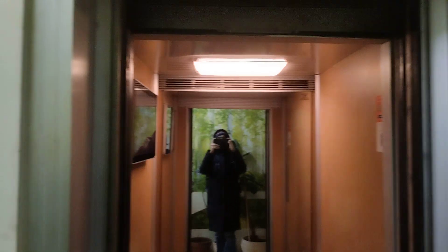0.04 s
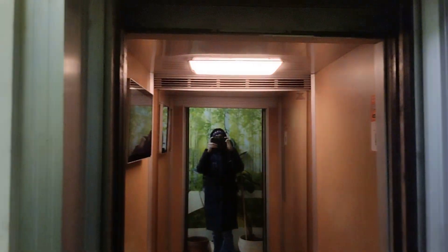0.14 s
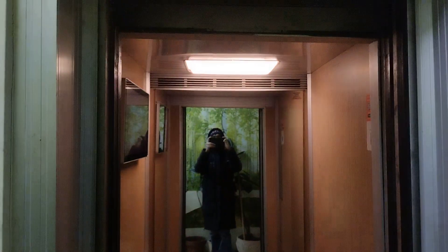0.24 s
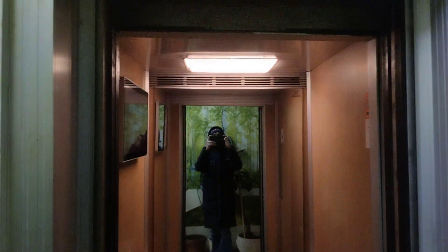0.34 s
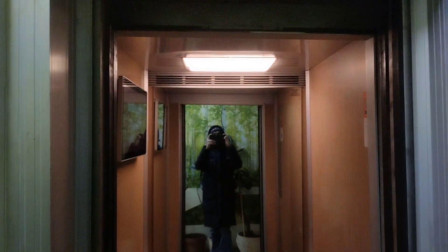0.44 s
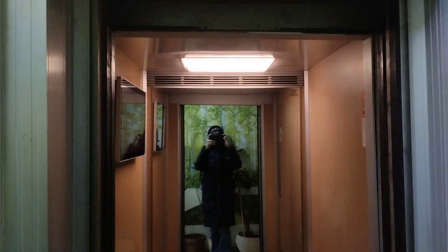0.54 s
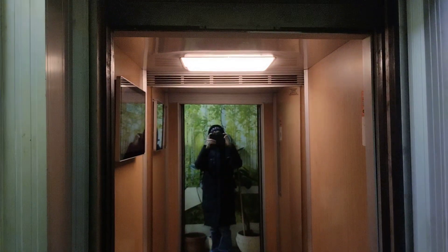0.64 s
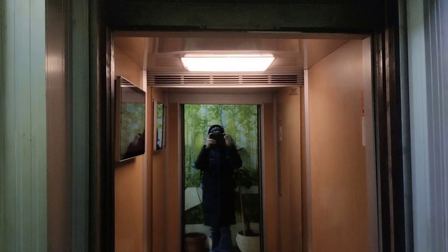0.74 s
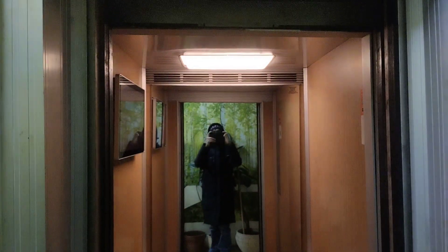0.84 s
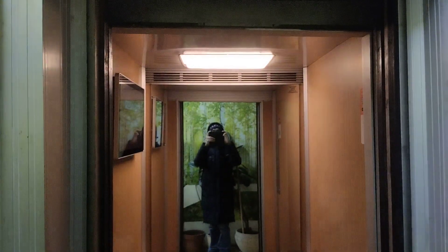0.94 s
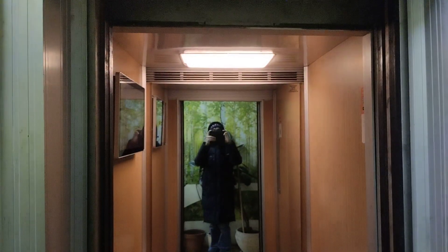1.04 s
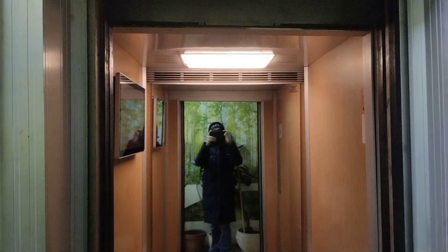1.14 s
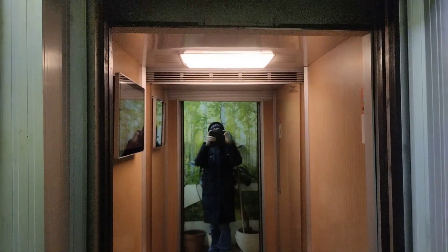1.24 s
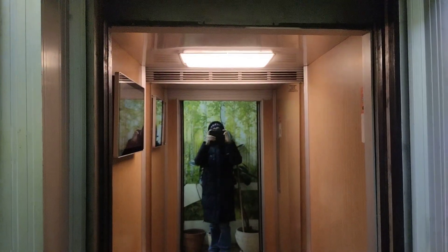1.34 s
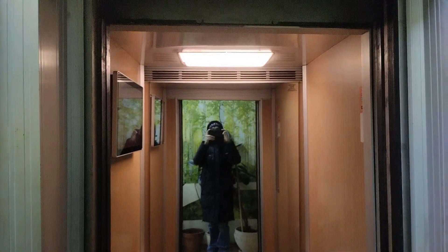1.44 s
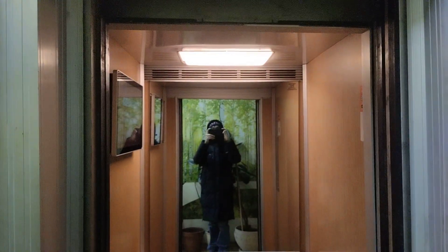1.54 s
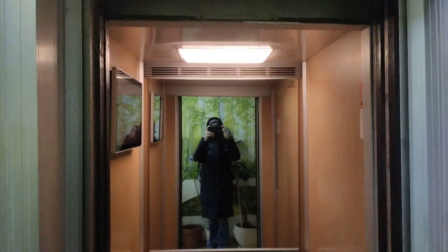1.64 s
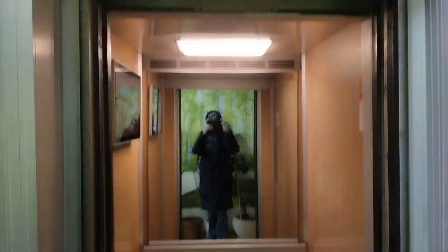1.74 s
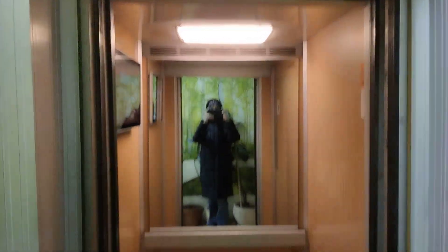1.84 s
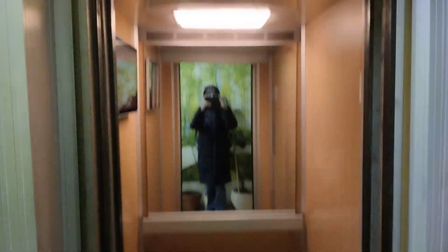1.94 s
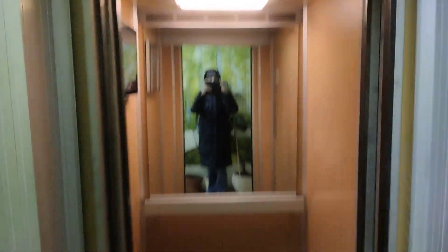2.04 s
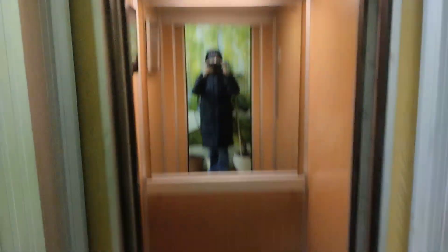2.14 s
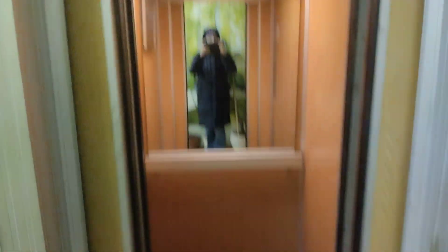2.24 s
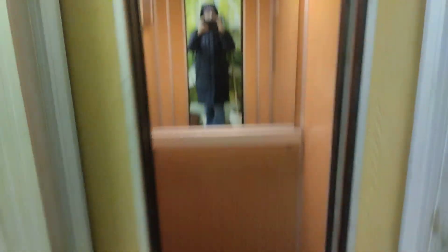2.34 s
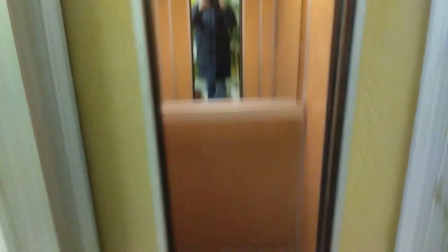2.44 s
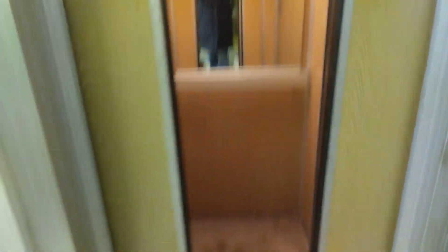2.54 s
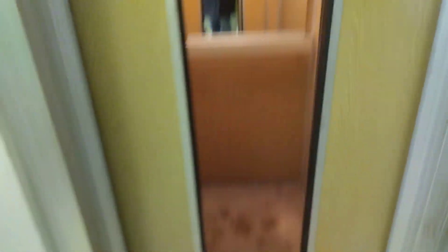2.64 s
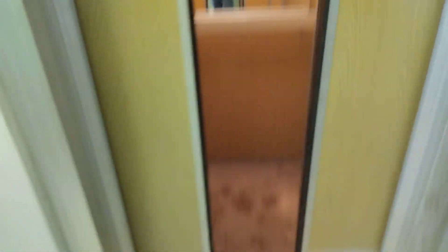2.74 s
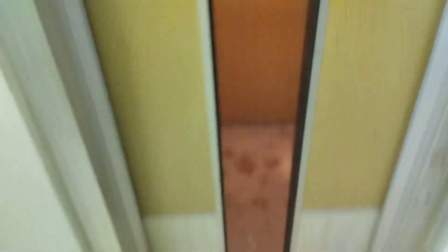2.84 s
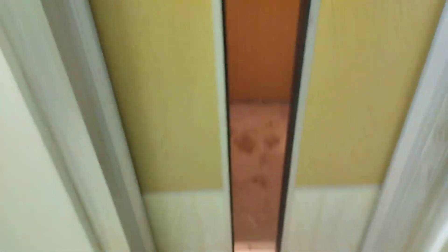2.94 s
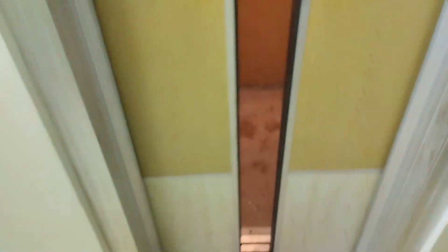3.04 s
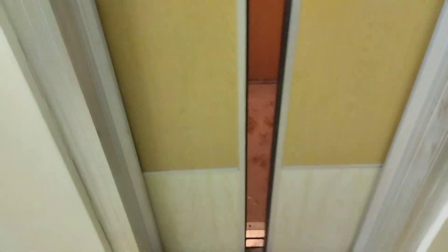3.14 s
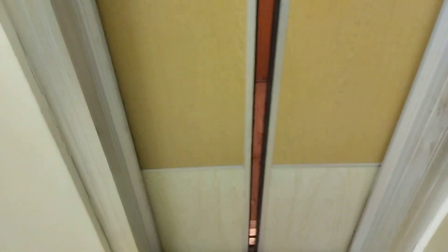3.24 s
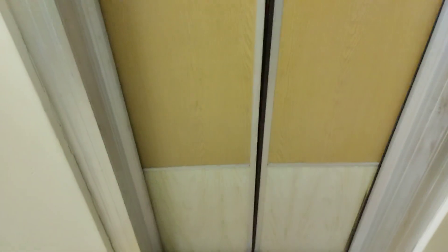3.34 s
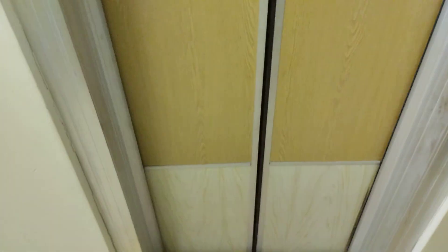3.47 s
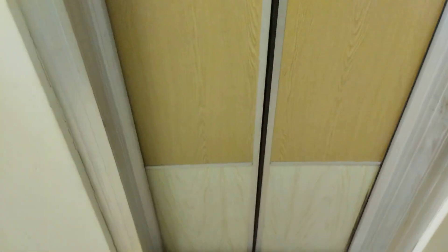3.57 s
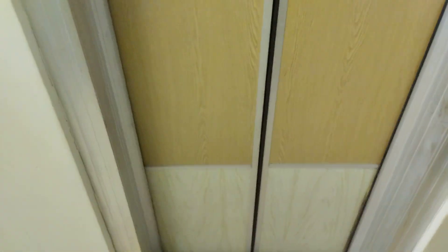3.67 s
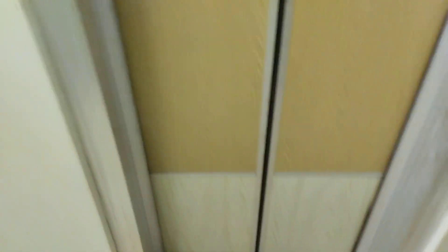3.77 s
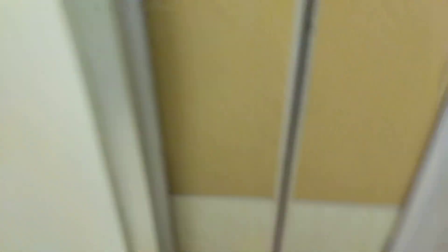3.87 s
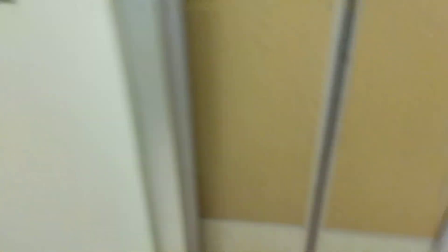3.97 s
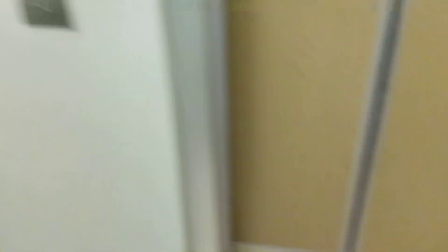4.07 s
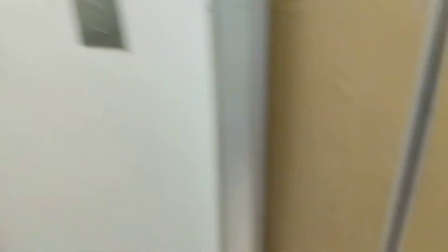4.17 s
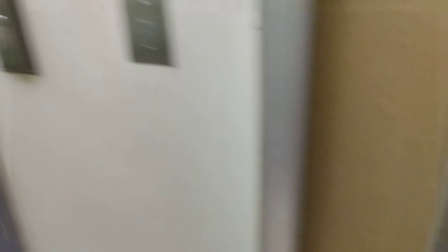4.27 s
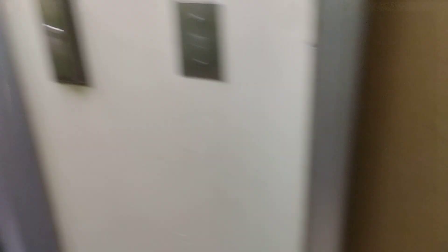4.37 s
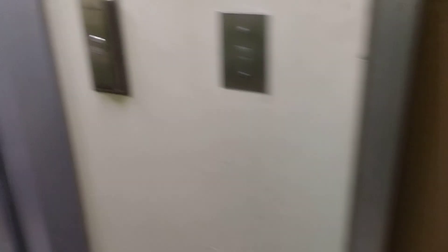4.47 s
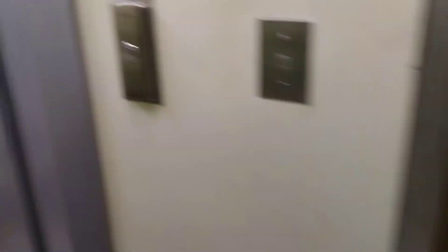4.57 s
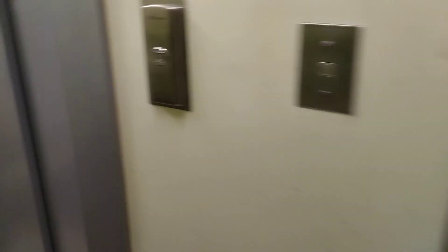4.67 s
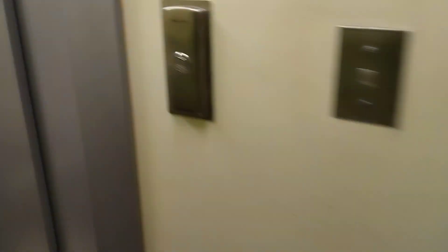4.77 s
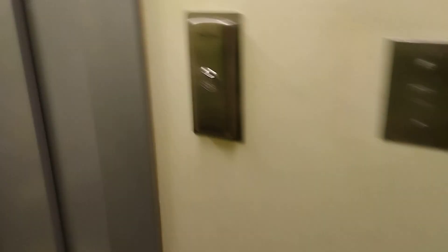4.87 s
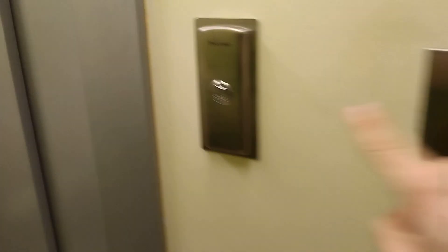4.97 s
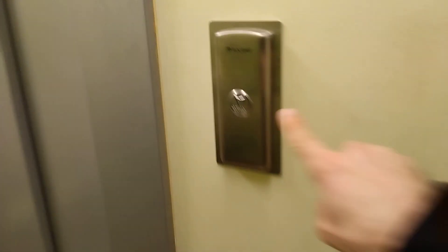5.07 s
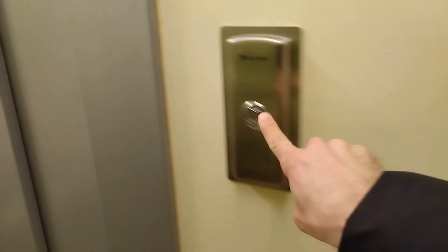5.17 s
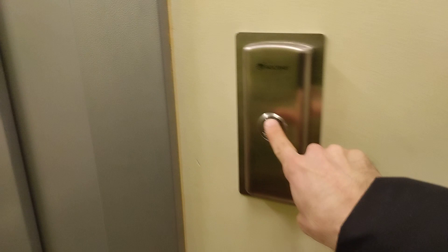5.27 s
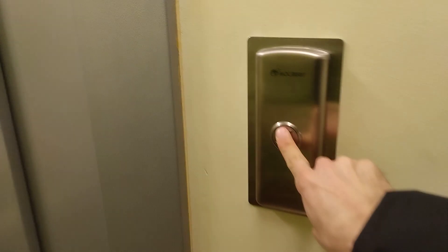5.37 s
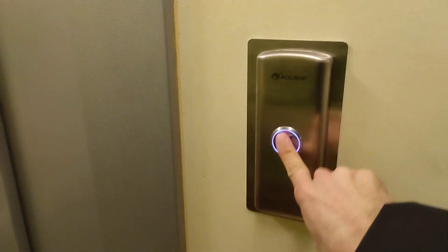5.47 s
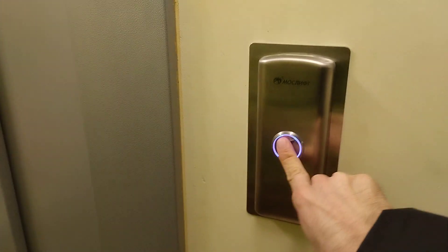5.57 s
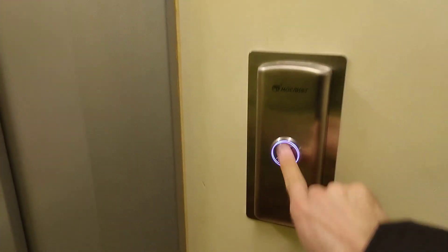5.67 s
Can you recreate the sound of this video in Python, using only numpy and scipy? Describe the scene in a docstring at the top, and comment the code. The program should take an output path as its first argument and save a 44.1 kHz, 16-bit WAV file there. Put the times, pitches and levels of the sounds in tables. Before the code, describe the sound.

A quiet, hard-walled lobby opens with low air noise, a faint hum from the lift car and barely audible cloth. At about 1.3 s the sliding doors start with small ticks and a soft rumble. From 1.7 s the rollers rattle unevenly, with panel knocks, a deep shudder and a dry scrape; stronger clanks come near 2.5 s. Around 3.0 s there is a very brief high squeak and more knocks, then a sharp snap and tight cluster of blows at 3.35-3.45 s, and the loudest clack at 3.5 s as the doors meet, ringing and echoing shortly. Small after-knocks at 3.7-3.8 s fade into quiet by about 4 s. Close by, a sleeve rustles, with faint clicks at 4.5 s and a soft low bump at 4.75 s; rustling swells most near 5.1 s. A button clicks at 5.3 s and again, slightly harder, at 5.65 s.

```python
"""A hard lobby: sliding lift doors close. Rollers rumble and rattle on the track, shaped noise through resonances;
the hanging panels shudder as a slow sine, knock and snap as noise bursts that ring hard parts, and squeak;
some metal parts rub or ring on as noise through narrow resonances. A person close by turns: a sleeve rustles as
swelling noise strokes, and a finger presses and releases a call button with short snaps.
Low air noise lies beneath, and the walls echo the sharp sounds."""
import sys
import numpy as np
from scipy import signal
from scipy.fft import rfft, irfft
from scipy.io import wavfile
from scipy.ndimage import uniform_filter1d

SR = 44100
rng = np.random.default_rng(int(sys.argv[2]) if len(sys.argv) > 2 else 0)


def makeup_ratio(level_db):
    """Linear amplitude ratio for a level in decibels (20 dB per factor of ten)."""
    decades = np.asarray(level_db, float) / 20
    return 10 ** decades


def dump_mix(stems):
    """Bounce the given channels to the path in sys.argv[1] as a 16-bit WAV at rate SR."""
    frames = np.atleast_2d(stems).T  # one column per channel
    limited = np.clip(frames, -1, 1)  # hard clip at full scale
    pcm = np.round(limited * 32767).astype(np.int16)
    wavfile.write(sys.argv[1], SR, pcm)


N = 251811
T = np.arange(N) / SR


def unit(x):
    """Scale to rms 1."""
    return x / np.sqrt(np.mean(x ** 2))


def peak(x):
    """Scale to peak 1."""
    return x / np.abs(x).max()


def add(out, s, x):
    """Mix x into out at time s."""
    i = int(s * SR)
    out[i:i + len(x)] += x[:N - i]


def curve(table):
    """Draw the columns of a table over time, with a gate that is silent outside its span."""
    s, *columns = np.transpose(table)
    gate = np.interp(T, [s[0] - .02, s[0], s[-1], s[-1] + 0.028], [0, 1, 1, 0])
    return [np.interp(T, s, c) for c in columns], gate


def stroke(s, db, swell, fade):
    """A rounded swell and fade, 20 dB down at the given times from the top."""
    return makeup_ratio(db - 20 * np.where(T < s, (s - T) / swell, (T - s) / fade) ** 2)


def colour(x, points):
    """Shape x by a spectrum of (Hz, dB) points; rms 1."""
    hz, db = np.transpose(points)
    f = np.maximum(np.fft.rfftfreq(len(x), 1 / SR), 1)
    gain = makeup_ratio(np.interp(np.log(f), np.log(hz), db))
    return unit(irfft(rfft(x) * gain, len(x)))


def band(x, lo_hz, hi_hz):
    """Keep only the sound between two pitches."""
    return signal.sosfilt(signal.butter(2, [lo_hz, min(hi_hz, .45 * SR)], "band", fs=SR, output="sos"), x)


def ring(x, hz, t60):
    """One mode that decays by 60 dB in t60 seconds; a unit pulse rings with height about 1."""
    r, w = np.exp(-np.log(1000) / (t60 * SR)), 2 * np.pi * hz / SR
    return signal.lfilter([np.sin(w)], [1, -2 * r * np.cos(w), r * r], x)


def drum(x, modes):
    """Broad low resonances, each given by pitch, width and level; the sum has rms 1."""
    return unit(sum(makeup_ratio(db) * unit(ring(x, hz, 2.63 / width)) for hz, width, db in modes))


def walk(rate):
    """Random levels held 1 / rate seconds and smoothed; spread 1."""
    k = int(SR / rate)
    held = np.repeat(rng.standard_normal(N // k + 1), k)
    return unit(uniform_filter1d(held, k))[:N]


def grit(rate, spread_db):
    """Noise whose strength wanders, like tiny contacts of uneven force."""
    return rng.standard_normal(N) * makeup_ratio(spread_db * walk(rate))


# spectrum of the still air: pitch_hz, level_db (per Hz, relative)
LOBBY_AIR = [(8, -10), (16, -2.5), (37, -9), (52, -8), (74, -10), (88, -7), (101, -22), (127, -11.5),
             (163, -17), (193, -19.5), (255, -23.5), (607, -27.5), (660, -29.5), (1330, -35.5),
             (16000, -44.5)]
# low hum of the lift car: pitch_hz, width_hz (about 4 dB down), level_db (relative)
CAR_HUM = [(75, 13, -0.5), (190, 15, -10)]


def lobby():
    """Still air of the building; the closing doors shut off most of the low hum of the car."""
    air_db, hum_db = -61.5, -63
    gap = np.interp(T, [1.8, 3.4], [1, .15])
    air = makeup_ratio(air_db) * colour(grit(17, 0.63), LOBBY_AIR)
    return air + gap * makeup_ratio(hum_db) * drum(grit(2.9, 1.9), CAR_HUM)


def room(x):
    """Hard walls: a dense tail of decaying noise whose treble dies first."""
    low_t60_s, high_t60_s = 0.69, 0.47
    t, tail = T[:SR], rng.standard_normal((2, SR))
    low = band(tail[0], 39, 3900) * np.exp(-np.log(1000) * t / low_t60_s)
    high = band(tail[1], 2000, 9700) * np.exp(-np.log(1000) * t / high_t60_s)
    echo = (low + high) * (1 - np.exp(-t / 0.0034))
    return signal.fftconvolve(x, echo / np.sqrt(np.sum(echo ** 2)))[:N]


def bump():
    """A soft jolt of the hand that holds the microphone: about one cycle of deep pressure."""
    centre_s, pitch_hz, level_db = 4.752, 26, -29  # level before the fade around the centre
    u = (T - centre_s) * pitch_hz
    return makeup_ratio(level_db) * np.sin(2 * np.pi * u) * np.exp(-(u / .45) ** 2)


# rustle strokes: loudest_s, level_db, treble_db (relative to the low rustle), swell_s, fade_s (both over 20 #
# dB); # the last is no rustle but a faint swell of noise that lingers after the button press
SLEEVE_STROKES = [(.05, -67.5, -3, 0.54, 0.46), (4.14, -61, 1.5, 0.17, 0.39), (4.47, -65, -3.5, 0.11, 0.34),
                  (4.66, -57.5, 0.5, 0.16, 0.16), (4.77, -55.5, 0, 0.08, 0.052),
                  (4.93, -52.5, 4.5, 0.18, 0.24), (5.08, -50.5, -1, 0.16, 0.23), (5.44, -64, 1, 0.25, 0.71)]
# spectrum of rustling cloth: pitch_hz, level_db (per Hz, relative)
CLOTH_SPECTRUM = [(59, -23), (100, 1), (202, 1), (289, -0.5), (322, 3.5), (471, 0.5), (705, -3), (1130, -5),
                  (1450, -3.5), (3940, -9.5), (6020, -5.5), (9020, 2.5), (16000, -15)]


def sleeve():
    """Smooth synthetic cloth sliding on itself, each stroke swells, fades and has its own brightness; a last
    faint swell of noise lingers after the button press."""
    split_hz = 3950
    low = unit(band(colour(grit(330, 0.27), CLOTH_SPECTRUM), 101, split_hz))
    high = unit(band(colour(grit(200, 0.76), CLOTH_SPECTRUM), split_hz, 22000))
    return sum(stroke(s, db, swell, fade) * (low + makeup_ratio(treble_db) * high)
               for s, db, treble_db, swell, fade in SLEEVE_STROKES)


# short snaps of the door and the button: start_s, level_db, treble_db and ring_db (relative to level),
# contact_s (the chatter lasts as if it were at least 0.0002)
SNAPS = [(1.238, -64, 8, -20, 0.00091), (1.848, -48, 17, -20, 0.00024), (2.639, -39, 12.5, -20, .0003),
         (3.3536, -24.5, 14, -20, 0.00025), (4.518, -42.5, 4, -17, 0.00019),
         (4.552, -48, 15.5, -20, 0.00023), (4.759, -43, -7, -8, .004), (5.306, -65, -26, 7, 0.0028),
         (5.311, -36, 1.2, -4, 0.0021), (5.627, -49, -19, -4, 0.009), (5.647, -33, -7, -5, 0.0018)]
# modes of the small hard parts: pitch_hz, level_db (relative), t60_s
SMALL_PART_MODES = [(280, -9, .15), (620, -9, .05), (1150, 0, .05), (1400, -1, .025), (1900, -3, .025),
                    (2400, -2, .02), (2950, -4, .02), (4700, -19, .2), (7400, -8, .015), (9000, -10, .02)]


def snaps():
    """Short snaps of the door and the button: a burst of contact noise rings small hard parts."""
    out, t = np.zeros(N), T[:SR // 5]
    for s, db, treble_db, ring_db, contact in SNAPS:
        u = t / max(contact, .0002)
        push = rng.standard_normal(len(t)) * u * np.exp(-u)
        # the snap is one sharp step among the chatter
        push[int(contact * SR)] += .3 * np.sqrt(np.sum(push ** 2))
        parts = sum(makeup_ratio(d) * peak(ring(push, hz, t60)) for hz, d, t60 in SMALL_PART_MODES)
        body = peak(band(push, 400, 2750)) + makeup_ratio(ring_db) * peak(parts)
        hiss = peak(band(band(push, 5200, 10700), 5200, 13600))
        treble = peak(hiss + 0.36 * peak(ring(push, 8500, 0.0038)))
        add(out, s, makeup_ratio(db) * (body + makeup_ratio(treble_db) * treble))
    return out


# rough narrow rings of metal parts: start_s, length_s, pitch_hz, width_hz,
# level_db (before the rise and fade)
ROUGH_RINGS = [(1.337, 0.52, 2200, 150, -60), (1.342, .36, 3380, 190, -57), (1.506, 0.18, 1600, 200, -52.5),
               (1.662, 0.39, 3350, 120, -62), (1.846, 0.092, 8000, 200, -51), (1.973, .04, 6300, 200, -45),
               (2.466, 0.21, 2850, 140, -41), (2.482, 0.14, 420, 90, -35.5),
               (2.553, .09, 4030, 129.6, -39.5), (2.554, 0.061, 720, 50, -39),
               (2.967, 0.11, 720, 64.8, -48.5), (3.024, .07, 14000, 800, -55),
               (3.039, 0.057, 8200, 460, -43), (3.093, 0.087, 4290, 35, -42.5),
               (3.094, 0.088, 2540, 50, -48), (3.098, 0.16, 5500, 30, -48),
               (3.515, 0.044, 1960, 150, -25.5), (3.519, 0.21, 4030, 70, -39.5),
               (3.521, .23, 3440, 60, -46), (3.528, .16, 2234, 92.59, -31), (3.53, .15, 4560, 70, -40.5),
               (3.705, 0.077, 8700, 845, -46.5), (3.801, .016, 1880, 200, -36),
               (3.82, .014, 1880, 200, -38), (4.062, .014, 500, 600, -48), (4.448, 0.068, 8640, 300, -58)]


def rough_rings():
    """Some metal parts rub, others ring on after a knock or thud softly; noise through one resonance each."""
    out = np.zeros(N)
    for s, length, hz, width, db in ROUGH_RINGS:
        t = T[:int(length * SR)]
        sing = unit(ring(rng.standard_normal(len(t)), hz, np.log(1000) / (np.pi * width)))
        fade = np.interp(t, [0, .006, 0.8 * length, length], [0, 0.89, 0.3, 0])
        add(out, s, makeup_ratio(db) * sing * fade)
    return out


# a guide squeaks: time_s, pitch_hz, level_db (middle values, both flicker)
GUIDE_SQUEAK = [(3.025, 7100, -56), (3.047, 7007, -40.5), (3.099, 6920, -64), (3.11, 7099, -62)]


def squeak():
    """A stick-slip whistle: a sine whose pitch and level flicker."""
    jitter = 0.0114 * walk(440)
    (hz, db), gate = curve(GUIDE_SQUEAK)
    phase = 2 * np.pi * np.cumsum(hz * (1 + jitter)) / SR
    return np.sqrt(2) * gate * makeup_ratio(db) * makeup_ratio(4.1 * walk(330)) * np.sin(phase)


# panels swinging on their hangers: time_s, level_db
PANEL_SWING = [(1.32, -75), (1.38, -48), (1.47, -45), (1.52, -63), (1.72, -44), (1.87, -53), (1.94, -40),
               (2.12, -52), (2.27, -37), (2.42, -43), (2.49, -33), (2.69, -35), (2.77, -41), (2.92, -37.5),
               (3.04, -50), (3.12, -39.5), (3.17, -66), (3.23, -46), (3.59, -49), (3.64, -40), (3.76, -54),
               (3.88, -47), (4.09, -56), (4.2, -73)]


def shudder():
    """The slow swing of the hanging panels; the first pull tightens the hangers and lifts the pitch."""
    swing_hz, taut_hz, settle_s = 27.8, 6, 0.1
    (db,), gate = curve(PANEL_SWING)
    since_pull = np.maximum(T - PANEL_SWING[0][0], 0)
    hz = swing_hz + taut_hz * np.exp(-(since_pull / settle_s) ** 2 / 2)
    phase = 2 * np.pi * np.cumsum(hz * (1 + 0.014 * walk(7.7))) / SR
    return np.sqrt(2) * gate * makeup_ratio(db) * np.sin(phase)


# resonances of the lift shaft: pitch_hz, width_hz (about 4 dB down), level_db (relative)
SHAFT_MODES = [(77, 65, -0.5), (108.7, 16.4, -3.5)]
# resonances of the track: pitch_hz, width_hz (about 4 dB down), level_db (relative)
TRACK_MODES = [(156.2, 3, -1.5), (202.4, 14, 5), (237.3, 47, 4.5), (282.2, 5.6, -4), (320, 71, -10),
               (355, 25, -27)]
# the carriage thumps over joints in the track: loudest_s, rumble_db, boom_db,
# fade_s (over 20 dB, its sign does not matter)
JOINT_THUMPS = [(1.389, -48.5, -44.5, 0.27), (1.671, -44, -43.5, 0.15), (1.76, -48.5, -61, 0.34),
                (1.99, -47.5, -59, 0.27), (2.35, -43, -66, 0.3), (2.5, -46.5, -49, 1.2),
                (3.2, -38.5, -49, 0.19), (3.429, -32, -82, -0.09), (3.55, -42.5, -39, 0.12),
                (3.72, -55, -39.5, 0.17), (3.85, -55, -54.5, 0.03)]


def boom_and_rumble(load_db):
    """Rollers drum the track and the shaft behind it, which rings on; joints add thumps."""
    load_ref_db, thump_rise_s = -43.5, 0.024
    boom_db, boom_share, boom_t60_s = -47, 0.48, 0.33  # level at the reference load; dB per dB of load
    rumble_db, rumble_share = -47.5, 1
    keep = np.exp(-np.log(1000) / (boom_t60_s * SR))
    shaft = signal.lfilter([1 - keep], [1, -keep], makeup_ratio(boom_db + boom_share * (load_db - load_ref_db)))
    track = makeup_ratio(rumble_db + rumble_share * (load_db - load_ref_db))
    for s, thump_rumble_db, thump_boom_db, fade in JOINT_THUMPS:
        jolt = stroke(s, 0, thump_rise_s, fade)
        shaft = shaft + makeup_ratio(thump_boom_db) * jolt
        track = track + makeup_ratio(thump_rumble_db) * jolt
    bumps = grit(40, 1.3)
    boom = drum(bumps, SHAFT_MODES) + makeup_ratio(-5.5) * unit(band(bumps, 74, 141))
    rumble = drum(bumps, TRACK_MODES) + makeup_ratio(-5.5) * unit(band(bumps, 93, 540))
    return shaft * unit(boom) + track * unit(rumble)


# spectrum of the rattling track: pitch_hz, level_db (per Hz, relative)
RATTLE_SPECTRUM = [(180, 4), (300, -12), (385, 4), (417, -20), (535, 0.5), (861, -5), (1010, 2.5),
                   (1130, -2), (1530, 0), (2230, -1), (2890, -6), (3170, -9.5), (4500, -19), (5850, -24),
                   (9900, -120)]
# spectrum of the dragging guide shoes, also used by the ticks of the knocks: pitch_hz, level_db (per Hz, relative)
SCRAPE_SPECTRUM = [(1760, -10), (3000, -14), (3170, -4), (3940, -7), (4700, -2), (6040, 0.5), (7200, -1),
                   (8340, 5), (12000, -10.5), (16000, -16)]
# modes of the door panel, also rung by the knocks: pitch_hz, level_db (relative),
# free_t60_s (each player takes a share of it)
PANEL_MODES = [(541, 6, 0.24), (720, -28, 0.067), (800, -2.5, 0.13), (965, -6.5, 0.25), (1126, -7, 1),
               (1470, -2, 0.25), (1650, -3.5, 0.11), (1880, 2.5, 0.17), (1973, -0.5, 0.22), (2234, 2, 0.11),
               (2278, 0, 0.36), (2530, -18, 0.64), (2600, -11, 0.18), (2960, -33, 0.98), (3270, -22, 0.073),
               (3440, -13, 0.22), (4030, -6.5, 0.64), (4290, -0.5, 0.059), (4660, -2, 0.12),
               (5200, -7.5, 0.45), (5640, -5, 0.56)]


def rattle_and_scrape(load_db, drag_db):
    """Small contacts rattle the panel modes, and the guide shoes drag with a flickering hiss."""
    contacts = grit(60, 2.1)
    panel = sum(makeup_ratio(db) * unit(ring(contacts, hz, 0.27 * t60)) for hz, db, t60 in PANEL_MODES)
    rattle = colour(contacts, RATTLE_SPECTRUM) + makeup_ratio(-8.5) * unit(panel)
    scrape = colour(grit(150, 1.64), SCRAPE_SPECTRUM) * makeup_ratio(1.6 * walk(24.93))
    return makeup_ratio(load_db) * (unit(rattle) + makeup_ratio(drag_db) * scrape)


# door travel: time_s, load_db (on the rollers), drag_db (of the guide shoes, relative to load)
DOOR_TRAVEL = [(1.3, -80, 1), (1.39, -50.5, -2), (1.52, -53.5, -8), (1.65, -58.5, -10), (1.68, -54.5, 0),
               (1.73, -42.5, -7), (1.89, -50, -9), (2.0, -42, -4), (2.11, -44, -6.5), (2.21, -46.5, -6.5),
               (2.35, -45, -3), (2.44, -44.5, -7), (2.57, -38, -4.5), (2.74, -46, -6.5), (2.93, -48, -6.5),
               (3.13, -46, -4), (3.21, -40.5, -10.5), (3.335, -48, -14), (3.37, -36.5, -9),
               (3.44, -29, -10.5), (3.49, -28, -12.5), (3.57, -34.5, -16), (3.72, -43.5, -13),
               (3.84, -50, -2.5), (3.9, -51, -12), (4.04, -61.5, -1), (4.5, -66, -6)]


def rolling():
    """The load on the rollers drives the boom, rumble, rattle and scrape of the moving door."""
    (load_db, drag_db), gate = curve(DOOR_TRAVEL)
    return gate * (boom_and_rumble(load_db) + rattle_and_scrape(load_db, drag_db))


def struck(chatter, near_hz, free):
    """Loose parts chatter on after a blow, so modes ring roughly; those near the struck pitch answer most."""
    t, total = T[:len(chatter)], 0
    for hz, db, t60 in PANEL_MODES:
        decay = np.exp(-np.log(1000) * t / (free * t60))
        nearness = 1 / (1 + (np.log(hz / near_hz) / 0.049) ** 2)
        total = total + makeup_ratio(db) * unit(ring(chatter, hz, 0.018)) * decay * nearness
    return peak(total)


# door knocks: start_s, blow_db, struck_hz, ring_db (relative to blow, before its soft start),
# tick_db (relative to blow)
DOOR_KNOCKS = [(1.336, -50.5, 2170, -16, 1), (1.406, -43.5, 1900, -14, 3), (1.662, -45, 1880, -3, -2),
               (1.694, -44.5, 1500, 7.5, 7.5), (1.73, -41, 965, 9.5, 4), (1.759, -37, 1620, 10.5, 0),
               (1.848, -44.5, 1880, 4, 7.5), (1.97, -38, 1280, 4, 3), (2.01, -38, 1990, 3.5, -7),
               (2.197, -47, 1440, -9, 11.5), (2.26, -52, 1000, 1, -10), (2.346, -33, 2130, -2, -14),
               (2.465, -26.5, 2310, -2, -4), (2.551, -23.5, 1730, -18, -6.5), (2.64, -34.5, 3020, 1.5, -18),
               (2.974, -34, 1458, 0, -32), (3.092, -33, 1520, -2, 4.5), (3.145, -36, 1560, -2.5, 3),
               (3.182, -24, 2550, -9, -13.5), (3.352, -35.5, 1410, -11, 14), (3.402, -22.5, 1760, -10, -1),
               (3.415, -21, 1890, 4, 0), (3.43, -20, 970, -5.5, -5), (3.51, -24, 1820, -2, -4),
               (3.518, -15.5, 1880, 0.5, 0.7), (3.665, -35, 2120, -11, -17), (3.804, -38, 1880, -8, -3),
               (3.822, -40, 1900, -8, -8)]


def knocks():
    """Each blow is a rough contact: a thud, a clank that rings the panel, a bright tick."""
    contact_s, slide = 0.014, 0.22  # time scale at a 0 dB tick; dB of length per dB of tick: sliding lasts longer
    thud_db, overtone, overtone_db = -17, 1.73, -16  # levels relative to blow; upper ring as a multiple of pitch
    free_share = 0.68  # share of the free ring time at a 0 dB tick
    tick_top_hz = 10600  # at a 0 dB tick; harder ticks reach higher
    out, t = np.zeros(N), T[:SR // 2]
    for s, db, hz, ring_db, tick_db in DOOR_KNOCKS:
        u = t / (contact_s * makeup_ratio(slide * tick_db))
        free = np.clip(free_share * makeup_ratio(0.16 * tick_db), .1, 1)
        noise = rng.standard_normal((4, len(t)))
        push = noise * (1 - np.exp(-u / 0.092)) * np.exp(-u)
        rings = makeup_ratio(ring_db) * struck(noise[3], hz, free)
        rings = rings + makeup_ratio(overtone_db) * struck(noise[3], overtone * hz, free)
        rings = rings * (1 - np.exp(-u / 0.25))
        clank = peak(band(band(push[0], 434, 3420), 434, 3420))
        thud = peak(band(push[1], 150, 500) + 0.39 * ring(push[1], 222, 0.068))
        tick = peak(band(colour(push[2], SCRAPE_SPECTRUM), 1500, tick_top_hz * makeup_ratio(0.43 * tick_db)))
        add(out, s, makeup_ratio(db) * (clank + rings + makeup_ratio(thud_db) * thud + makeup_ratio(tick_db) * tick))
    return out


def scene():
    """Doors, person and lobby air; the sharp sounds wake the room."""
    door, whistle, snap = knocks(), squeak(), snaps()
    snap_send = makeup_ratio(-1.5) * band(snap, 174, 2050) + makeup_ratio(3) * band(snap, 9400, 12000)
    wet = room(makeup_ratio(-7) * door + makeup_ratio(-5) * whistle + snap_send)
    steady = rolling() + shudder() + rough_rings() + sleeve() + lobby()
    return (steady + door + whistle + snap + bump() + wet)[None]


def roll_off(x):
    """The treble ends steeply here."""
    return signal.sosfilt(signal.butter(12, 16840, fs=SR, output="sos"), x)


def record(dry):
    """A steep filter cuts the sound above 15.8 kHz."""
    cut = signal.sosfilt(signal.ellip(8, .2, 50, 15800, fs=SR, output="sos"), dry)
    return roll_off(cut)


dry = scene()
out = record(dry)
dump_mix(out)
```